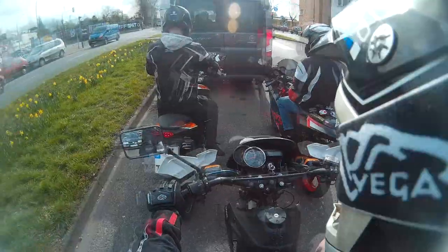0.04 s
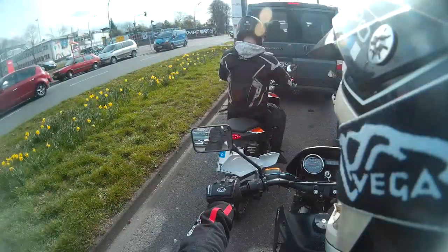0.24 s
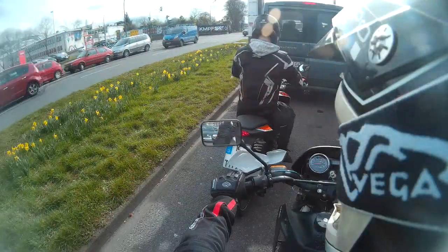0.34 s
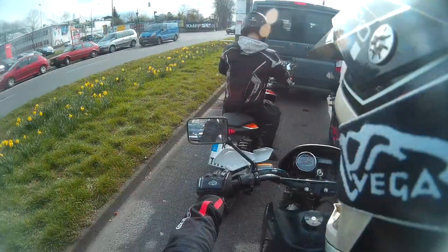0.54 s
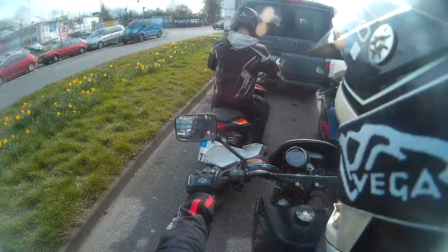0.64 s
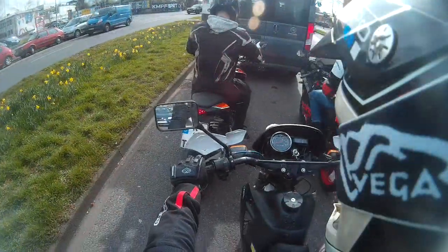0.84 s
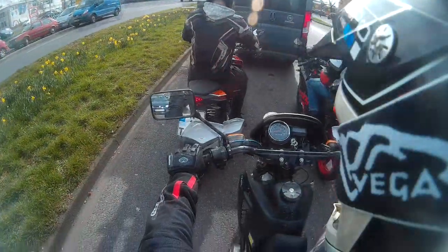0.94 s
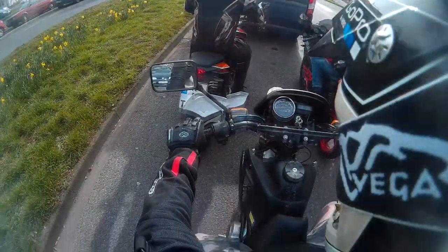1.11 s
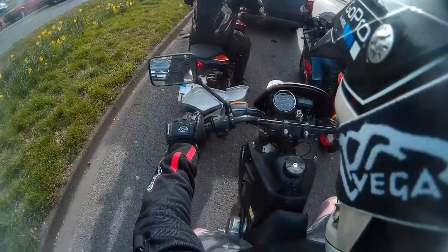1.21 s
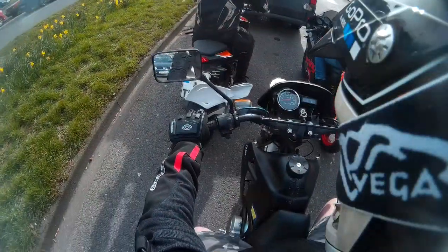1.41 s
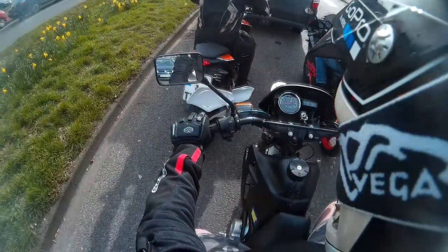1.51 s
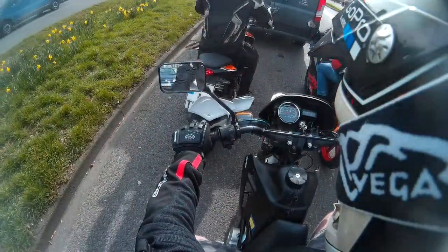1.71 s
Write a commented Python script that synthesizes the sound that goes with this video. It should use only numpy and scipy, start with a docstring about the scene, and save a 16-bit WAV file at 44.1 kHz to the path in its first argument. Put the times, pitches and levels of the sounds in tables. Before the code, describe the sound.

Single motorcycle throttle blip, raspy and rattling, falling away in a whirring whine over idling engines

```python
"""Motorcycle blip in a queue

A small motorcycle is blipped once from idle and runs down again, heard from the rider's helmet.
Chirps, rasp and ticks make thin metal buzz in a double slap on every turn, strongest under throttle.
After the throttle shuts, exhaust harmonics and gear tones glide down over a whirr of shaped noise.
Decaying modes make a neighbouring engine thump over coloured noise, the idling traffic.
"""
import sys
import numpy as np
from scipy import signal
from scipy.fft import rfft, irfft
from scipy.io import wavfile
from scipy.ndimage import uniform_filter1d, map_coordinates

SR = 44100
rng = np.random.default_rng(int(sys.argv[2]) if len(sys.argv) > 2 else 0)


def pcm_store(signal):
    """Save signal as 16-bit PCM."""
    levels = np.round(np.clip(np.atleast_2d(signal), -1, 1) * 32767)
    wavfile.write(sys.argv[1], SR, levels.astype(np.int16).T)


N = 77175


def amp(db):
    """Decibels to gain."""
    return 10 ** (np.asarray(db) / 20)


def unit(x):
    """Scale to rms 1."""
    return x / np.sqrt(np.mean(x ** 2))


def curve(rows):
    """Join (time [s], value) points by straight lines."""
    return np.interp(np.arange(N) / SR, *np.array(rows).T)


def response(hz, points):
    """Gain of a (frequency [Hz], level [dB]) curve at the given frequencies."""
    f, db = np.array(points).T
    return amp(np.interp(np.log(np.maximum(hz, 1)), np.log(f), db))


def resonance(hz, centre_hz, width_hz):
    """Complex gain of one resonance, 1 at its centre."""
    return 1j * hz * width_hz / (centre_hz ** 2 - hz ** 2 + 1j * hz * width_hz)


def colour(x, points, rings=()):
    """Causal filter: a broad spectral shape with resonances on top; output at rms 1."""
    hz = np.arange(N + 1) * SR / (2 * N)
    power = response(hz, points) ** 2
    for f, half_width, db in rings:
        ring_gain = amp(db) * abs(resonance(hz, f, 2 * half_width)) ** 2
        power = power + ring_gain ** 2
    # folding the cepstrum forward gives the minimum-phase filter
    cepstrum = irfft(np.log(power) / 2)
    cepstrum[1:N] *= 2
    cepstrum[N + 1:] = 0
    gain = np.exp(rfft(cepstrum))
    return unit(irfft(rfft(x, 2 * N) * gain)[:N])


def walk(rate):
    """Smooth random wander with spread 1, taking a new step `rate` times a second."""
    k = int(SR / rate)
    steps = rng.standard_normal(N)[np.arange(N) // k]
    return unit(uniform_filter1d(steps, k))


def clatter(turns, repeat, size=1400):
    """Tiny contacts: a share of the power comes back alike on every turn, the rest is fresh."""
    whole = np.floor(turns)
    age = np.arange(N) - np.interp(whole, turns, np.arange(N))  # samples since the turn began
    alike = map_coordinates(rng.standard_normal(size), [age], mode="mirror")
    return np.sqrt(repeat) * alike + np.sqrt(1 - repeat) * rng.standard_normal(N)


def partial(turns, multiple, waver_db):
    """One wavering multiple of the engine speed."""
    tone = np.sqrt(2) * np.sin(2 * np.pi * (multiple * turns + rng.random()))
    return tone * amp(waver_db * walk(24.57))


SHUT_S, SHUT_LEN_S = .594, .006  # middle and length of the throttle's snap


def shut():
    """0 while the throttle is open, 1 once it has snapped shut."""
    return np.clip((np.arange(N) / SR - SHUT_S) / SHUT_LEN_S + .5, 0, 1)


# engine speed before jitter: (time [s], speed [turns per second])
ENGINE_SPEED = [(0, 35), (.12, 38.5), (.19, 44), (.25, 53), (.3, 61), (.35, 66), (.4, 72), (.45, 80),
                (.5, 88), (.55, 93.5), (.6, 95.6), (.788, 88.5), (.942, 82.6), (1.138, 74.7), (1.236, 70.6),
                (1.524, 58.4), (1.63, 55.2), (1.75, 53.5)]
JITTER = .002  # spread, as a share of the speed


def engine_speed():
    """The shaft spins up with the blip and coasts down, with a slight random unsteadiness."""
    return curve(ENGINE_SPEED) * (1 + JITTER * walk(49.5))


# strength of the buzz before the drop at the shut throttle: (time [s], level [dB])
BUZZ_LEVEL = [(0, -59.5), (.11, -54), (.225, -46.5), (.265, -39), (.33, -34), (.41, -33), (.48, -29.5),
              (.59, -29.5), (.65, -22.5), (.8, -39), (1.1, -38), (1.42, -41), (1.55, -46), (1.75, -41)]
# the two slaps of each turn:
# (centre within the turn [s], length [s], start pitch [Hz], end pitch [Hz], relative level [dB])
SLAPS = [(-.0043, 0.0069, 2687, 2110, -3.5), (.0001, 0.0086, 2165, 2150, -2.5)]
# partials of a slap: (multiple of its pitch, delay [s], relative level [dB])
SLAP_PARTIALS = [(1, 0, 2), (1.37, .001, -7), (1.27, -.0015, -10)]
# spectral shape of the rasp: (frequency [Hz], relative level [dB])
RASP_COLOUR = [(200, -21), (600, -13.5), (1200, -5), (1800, 1.5), (2150, 7.5), (2600, -42), (3600, -2),
               (4150, -19), (4900, -15.5), (6100, -16.5), (8400, -27), (14000, -39), (15800, -55)]
# rings of the buzzing metal: (frequency [Hz], half-width at -6 dB [Hz], relative level [dB])
METAL_RINGS = [(2230, 100, -13), (2300, 24, -8), (2430, 9.4, 15), (2950, 50, -22), (3130, 23, -23),
               (4960, 61, -2.5)]
SLAP_SCATTER_DB, SLAP_PITCH_SCATTER, SLAP_JITTER_S = .8, .007, .00003  # pitch as a share
RASP_DB = -7  # against the chirps
RASP_REPEAT = .4  # share of power alike on every turn
RASP_SHARPNESS = 1.5  # exponent on the slap envelope
SHUT_DROP_DB = -17


def buzz(turns):
    """Two slaps on every turn: each a short falling chirp with a rasp; they drop as the throttle shuts."""
    t = np.arange(N) / SR
    chirps, gate = np.zeros(N), np.zeros(N)
    for turn_s in np.interp(np.arange(1, turns[-1]), turns, t):
        for centre_s, length_s, start_hz, end_hz, db in SLAPS:
            size, pitch, late = rng.standard_normal(3)
            pitch_factor = 1 + SLAP_PITCH_SCATTER * pitch
            for multiple, delay_s, partial_db in SLAP_PARTIALS:
                start = turn_s + centre_s + delay_s - length_s / 2 + SLAP_JITTER_S * late
                span = slice(*np.searchsorted(t, [start, start + length_s]))
                along = (t[span] - start) / length_s  # 0 to 1 through the slap
                level = amp(db + partial_db + SLAP_SCATTER_DB * size)
                swell = level * np.sin(np.pi * along) ** 2
                mean_hz = start_hz + (end_hz - start_hz) * (along + .5) / 2  # from mid-slap to now
                cycles = (along - .5) * length_s * mean_hz
                chirps[span] += swell * np.sin(2 * np.pi * cycles * multiple * pitch_factor)
                gate[span] += swell
    contacts = gate ** RASP_SHARPNESS * clatter(turns + .5, RASP_REPEAT)
    rasp = colour(contacts, RASP_COLOUR, METAL_RINGS)
    return (unit(chirps) + amp(RASP_DB) * rasp) * amp(curve(BUZZ_LEVEL) + SHUT_DROP_DB * shut())


# bright ticks of the slaps: (place within the turn [s], decay time constant [s], relative level [dB])
TICKS = [(-.0055, 0.0029, 0), (.0008, 0.0021, -3)]
# spectral shape of the ticks: (frequency [Hz], relative level [dB])
TICK_COLOUR = [(2500, -41), (4200, 2), (5000, 4), (6100, 0), (6900, -11), (7550, -7), (8400, -16),
               (10400, -7), (12000, -19), (13900, -14), (14800, -23)]
# rings of the ticks: (frequency [Hz], half-width at -6 dB [Hz], relative level [dB])
TICK_RINGS = [(4970, 90, 8.5), (7550, 160, 8.5), (10500, 170, 0.5), (13850, 170, -4)]
TICK_DB, TICK_SHUT_DB = -26.5, -27  # against the buzz strength; further drop at the shut throttle


def ticks(turns):
    """Bright bursts of contact noise lead and close the slaps of each turn and die away quickly."""
    t = np.arange(N) / SR
    turn_s = np.interp(np.arange(turns[-1]), turns, t)
    gate = 0
    for place_s, decay_s, db in TICKS:
        starts = turn_s + place_s
        age = abs(t - starts[np.searchsorted(starts, t) - 1])
        gate = gate + amp(db) * np.exp(-age / decay_s)
    bright = colour(gate * clatter(turns + .5, RASP_REPEAT), TICK_COLOUR, TICK_RINGS)
    return bright * amp(TICK_DB + curve(BUZZ_LEVEL) + TICK_SHUT_DB * shut())


# overall gain of the exhaust hum: (time [s], level [dB])
HUM_LEVEL = [(0, -59), (.2, -56), (.3, -46.5), (.45, -45), (.53, -40.5), (.62, -43.5), (.8, -40.5),
             (.92, -46.5), (1.15, -49.5), (1.3, -51), (1.75, -54)]
# exhaust harmonics before the pipe:
# (multiple of engine speed, level with throttle open [dB], level with throttle shut [dB])
HARMONICS = [(1, -5.5, -16), (3, 3.5, -13.5), (4, -0.5, -0.5), (5, -4.5, -5), (6, -3, -5), (7, -7, -11.5),
             (8, -9.5, -12), (9, -6.5, -12.5), (10, -8, -6.5), (12, -8.5, -11.5), (14, -11.5, -10.5)]
# exhaust pipe response: (frequency [Hz], gain [dB])
PIPE = [(40, 0), (100, -10.5), (150, -19), (200, -11.5), (275, -1.5), (320, -3.5), (380, 1), (415, -3),
        (455, 6.5), (520, -10), (680, 1), (850, -15.5), (1070, 1.5), (1300, -1)]
WAVER_DB_PER_MULTIPLE = .25  # higher harmonics waver more


def exhaust(turns, speed):
    """Low harmonics slide through the pipe's resonances; their balance changes when the throttle shuts."""
    closed = uniform_filter1d(shut(), size=900)  # softened to about 20 ms
    out = 0
    for multiple, open_db, shut_db in HARMONICS:
        tone = partial(turns, multiple, WAVER_DB_PER_MULTIPLE * multiple)
        balance = amp(open_db + closed * (shut_db - open_db))
        out = out + tone * response(multiple * speed, PIPE) * balance
    return out * amp(curve(HUM_LEVEL))


# low boom before its waver: (time [s], level [dB])
BOOM_LEVEL = [(0, -74), (.28, -67), (.33, -53.5), (.55, -58.5), (.63, -51), (.8, -69.5), (.88, -56.5),
              (1.03, -51), (1.2, -62.5), (1.75, -66.5)]


def boom(turns):
    """The second harmonic of the engine speed swells and sinks as a low boom."""
    return partial(turns, 2, waver_db=1.1) * amp(curve(BOOM_LEVEL))


# the pipe's steady ring as the revs pick up: (time [s], level [dB])
PIPE_RING_LEVEL = [(0, -67), (.12, -53.5), (.27, -42), (.42, -50), (.55, -53), (1.75, -70)]
PIPE_RING_HZ, PIPE_RING_WIDTH_HZ = 454.3, 39  # full width at -6 dB


def pipe_ring():
    """Uneven firings, as noise, keep one resonance of the pipe sounding at a fixed pitch."""
    hz = np.arange(N // 2 + 1) * SR / N
    gain = resonance(hz, PIPE_RING_HZ, PIPE_RING_WIDTH_HZ) ** 2
    ring = irfft(rfft(rng.standard_normal(N)) * gain, N)
    return unit(ring) * amp(curve(PIPE_RING_LEVEL))


# gear tones before the case and throttle: (multiple of engine speed, level [dB])
GEAR_TONES = [(17, -42), (22, -34), (23, -45), (24, -47), (26, -38), (27, -42), (28, -41), (29, -41),
              (30, -43), (32, -45), (34, -45), (38, -49)]
# response of the engine case: (frequency [Hz], gain [dB])
CASE = [(1300, -16), (1500, -8), (1700, -14), (1830, -12), (1900, 0), (1980, -2), (2060, 1), (2200, 1),
        (2350, -12), (2650, -13), (2870, -4), (3100, -8), (3700, -15)]
WAVER_DB = 2.4  # spread, for the gear tones and the thin high tone


def whine(turns, speed):
    """Gear tones light up as they pass the engine case's resonances, louder on the overrun."""
    out = 0
    for multiple, db in GEAR_TONES:
        tone = partial(turns, multiple, WAVER_DB) * amp(db)
        out = out + tone * response(multiple * speed, CASE)
    throttle = amp(-15 + 10 * shut())
    return out * speed / speed.max() * throttle


# mechanical whirr: (time [s], level [dB])
WHIRR_LEVEL = [(0, -58), (.2, -53), (.35, -46), (.47, -42), (.57, -37), (.65, -36), (.85, -37.5),
               (1.05, -39.5), (1.2, -39.5), (1.43, -43.5), (1.6, -47.5), (1.75, -53)]
# spectral shape of the whirr: (frequency [Hz], relative level [dB])
WHIRR_COLOUR = [(100, -21.5), (300, -9.5), (600, -11.5), (850, -11.5), (1080, -8.5), (1350, -7),
                (1520, -0.5), (1700, -4.5), (2120, 6.5), (2400, -11.5), (2900, -3.5), (3700, -10.5),
                (4200, -18.5), (5000, -15.5), (6000, -21), (8200, -35), (14000, -41), (15300, -63)]
WHIRR_REPEAT = .27  # share of power alike on every turn
WHIRR_PULSE_DB, WHIRR_GRAIN_DB = .8, .7  # swing once a turn; random spread


def whirr(turns):
    """Chain and valve gear clatter all the way round the turn, in uneven grains."""
    pulse_db = WHIRR_PULSE_DB * np.sin(2 * np.pi * turns)
    grain = amp(pulse_db + WHIRR_GRAIN_DB * walk(600))
    return colour(grain * clatter(turns, WHIRR_REPEAT), WHIRR_COLOUR) * amp(curve(WHIRR_LEVEL))


# exhaust thumps of the neighbouring engine, before trim: (time [s], level [dB])
THUMPS = [(0.001, -39.5), (0.076, -35.5), (.159, -37), (.245, -32.5), (.323, -33), (.417, -52),
          (.816, -35.5), (.909, -55), (1.009, -36), (1.104, -36), (1.316, -35.5), (1.366, -34),
          (1.412, -33), (1.456, -32), (1.493, -33.5), (1.531, -35.5), (1.737, -35.5)]
# its silencer's modes before pitch scatter: (frequency [Hz], relative level [dB], t60 [s])
SILENCER = [(276, -15, 0.054), (291.7, 10.5, 0.047), (433.6, 13, 0.017), (593, 0, 0.045)]
THUMP_RISE_S, THUMP_DB = 0.0061, -2.5  # attack time constant; trim on all thumps


def neighbour():
    """Each firing of the next engine rings its silencer's modes briefly, at slightly varying pitch."""
    out = np.zeros(N)
    for start, db in THUMPS:
        age = np.maximum(np.arange(N) / SR - start, 0)
        rise = 1 - np.exp(-age / THUMP_RISE_S)
        for hz, mode_db, t60 in SILENCER:
            scattered_hz = hz * (1 + 0.052 * rng.standard_normal())
            ring = np.sin(2 * np.pi * scattered_hz * age)
            decay = np.exp(-np.log(1000) * age / t60)
            out += amp(db + mode_db + THUMP_DB) * ring * decay * rise
    return out


# spectral shape of the idling queue: (frequency [Hz], relative level [dB])
TRAFFIC_COLOUR = [(25, -1), (60, 1), (110, -1.5), (200, 0.5), (290, 3.5), (360, -10), (450, -2.5),
                  (650, -7.5), (950, -8.5), (1550, -2), (2150, -20), (2600, -55.5), (4200, -42.5),
                  (6800, -31), (8500, -29.5), (15000, -38)]
TRAFFIC_DB, SWELL_DB = -50.5, 1.5  # level before the swell; spread of the swell
TONE_HZ, TONE_DB = 6804, -78  # level before its waver


def traffic():
    """The blended idle of the rest of the queue as coloured noise, with a thin wavering high tone."""
    idle = colour(rng.standard_normal(N), TRAFFIC_COLOUR) * amp(TRAFFIC_DB + SWELL_DB * walk(24.56))
    tone = np.sqrt(2) * np.sin(2 * np.pi * TONE_HZ * np.arange(N) / SR)
    return idle + tone * amp(TONE_DB + WAVER_DB * walk(60))


def scene():
    """One shaft drives the motorcycle's turning layers; the queue idles around it."""
    speed = engine_speed()
    turns = np.cumsum(speed) / SR
    metal = buzz(turns) + ticks(turns)
    pipe = exhaust(turns, speed) + boom(turns) + pipe_ring()
    gears = whine(turns, speed) + whirr(turns)
    return (metal + pipe + gears + neighbour() + traffic())[None]


def record(dry):
    """A steep low-pass cuts the top of the treble above 15.4 kHz."""
    low_pass = signal.ellip(10, .2, 80, 15400, fs=SR, output="sos")
    return signal.sosfilt(low_pass, dry)


dry = scene()
out = record(dry)
pcm_store(out)
```